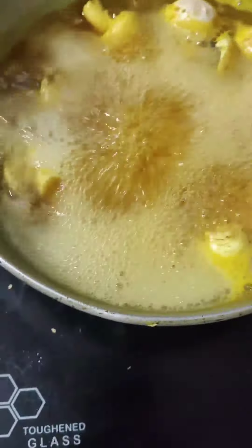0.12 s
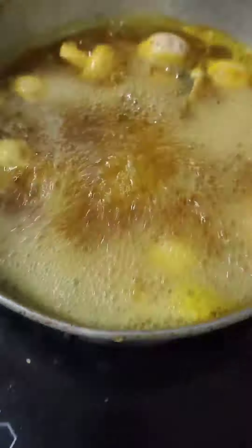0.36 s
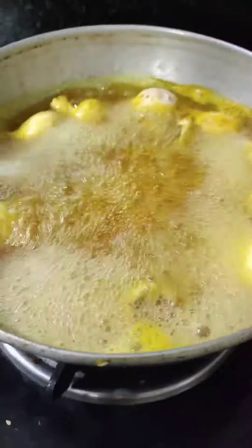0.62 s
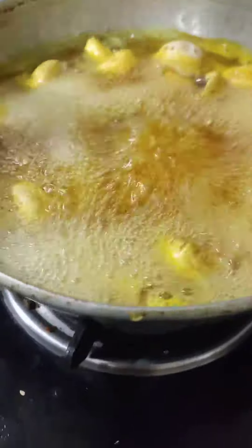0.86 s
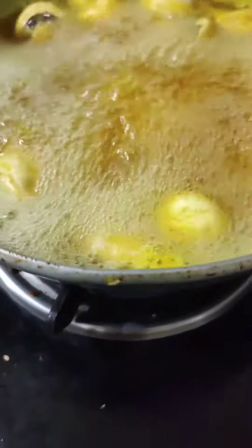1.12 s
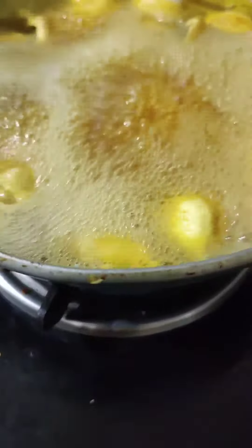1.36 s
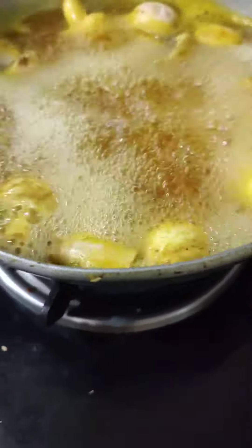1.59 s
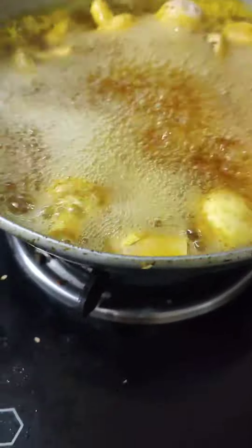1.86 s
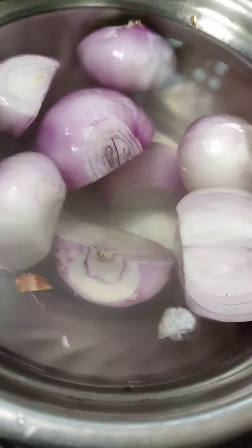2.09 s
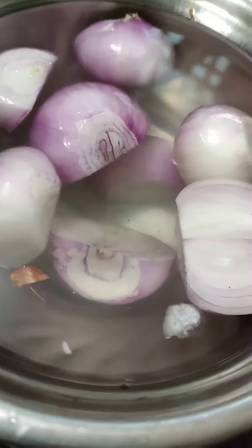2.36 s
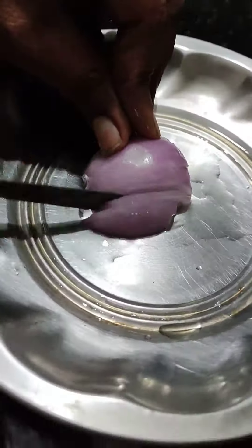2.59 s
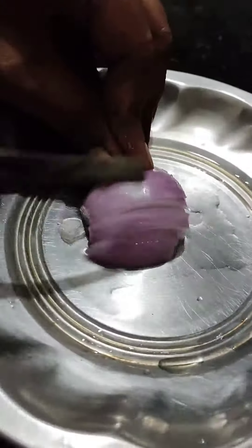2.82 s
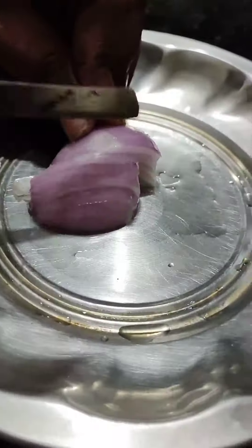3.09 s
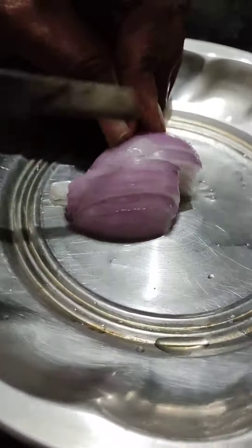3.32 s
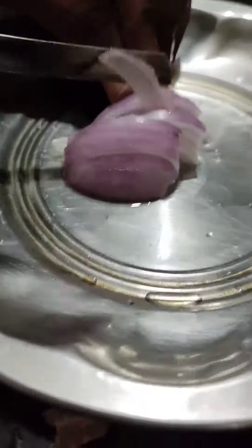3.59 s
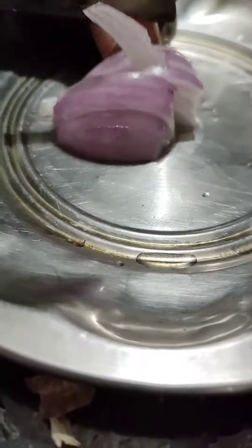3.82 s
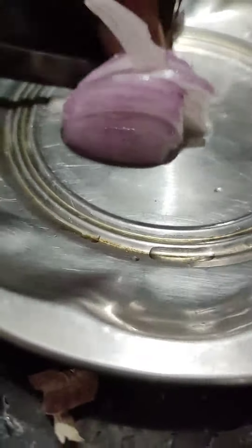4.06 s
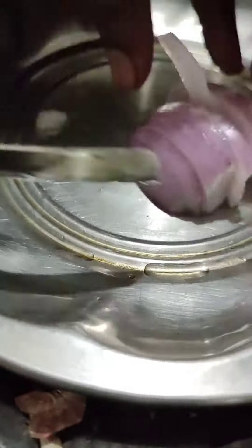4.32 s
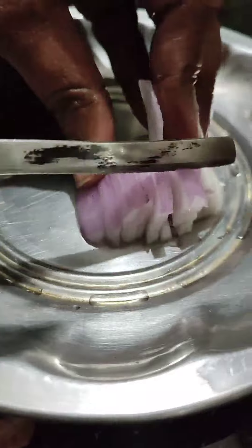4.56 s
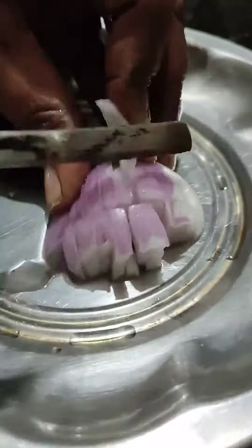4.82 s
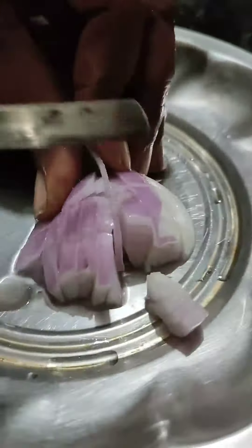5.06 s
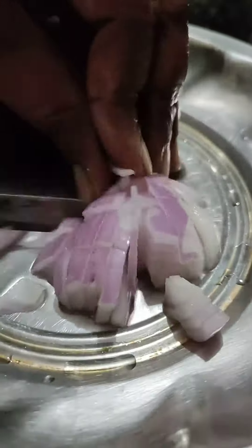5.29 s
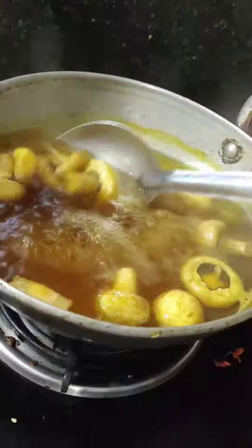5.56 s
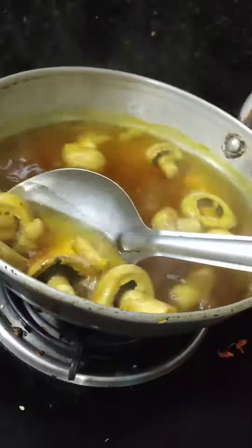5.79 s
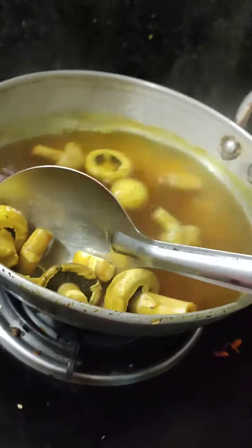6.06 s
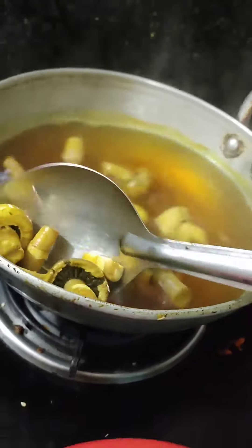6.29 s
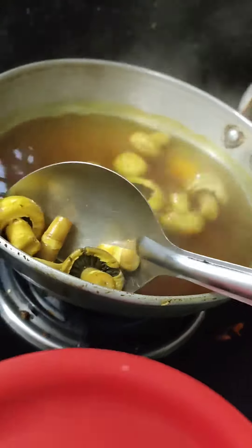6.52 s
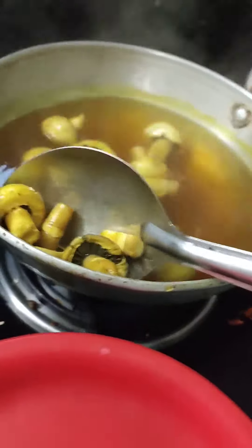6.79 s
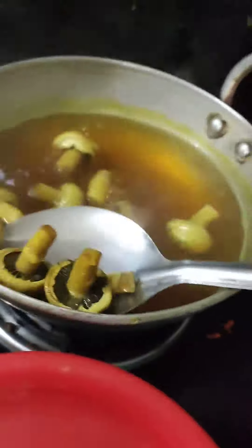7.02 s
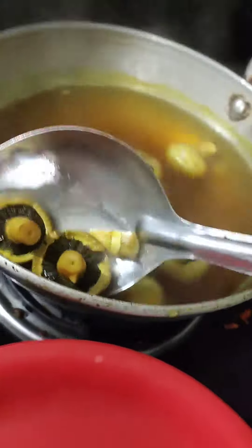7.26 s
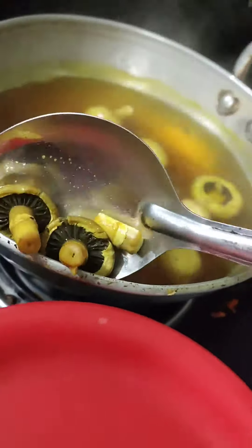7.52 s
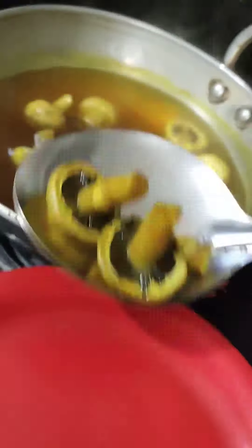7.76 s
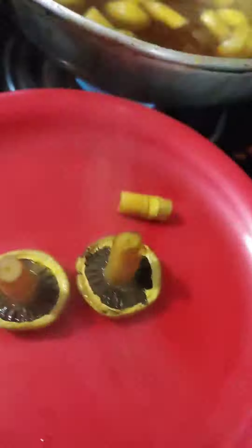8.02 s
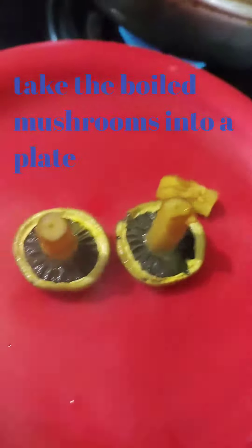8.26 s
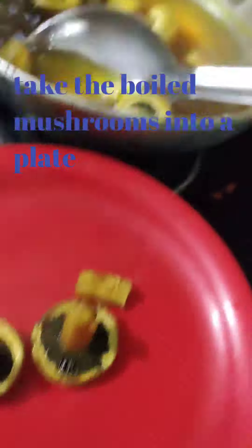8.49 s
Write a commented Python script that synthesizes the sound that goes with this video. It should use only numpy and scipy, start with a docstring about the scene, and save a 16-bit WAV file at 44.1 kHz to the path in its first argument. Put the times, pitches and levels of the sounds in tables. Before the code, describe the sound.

Four abruptly joined kitchen moments over low room rumble: soft boiling with crackling spray and short bird chirps; nearly still hum and faint gas hiss; irregular wet onion cuts with bright steel rings and dull thuds; then burner hiss with sparse ladle contacts, a damped metallic ring, one hard clank and light scrapes. Close stereo phone microphones, very short room echo.

```python
"""Four kitchen shots follow one another, heard through the two microphone ports of a phone.
First a pan simmers: flickering hiss, gliding bubbles, spits that ring the pan, and whistled bird notes outdoors.
A quiet shot of soaking onions has only a motor hum and burner hiss; then, over both, a knife saws an onion
on a steel plate: swarms of tiny slips ring the steel, and touches on it thud. Last a ladle works in a steel pan
of water, with hiss and a few birds. A room rumble lies under all; shots two to four fade in from a faint level."""
import sys
import numpy as np
from scipy import signal
from scipy.fft import rfft, irfft, next_fast_len
from scipy.io import wavfile
from scipy.ndimage import uniform_filter1d

SR = 44100
rng = np.random.default_rng(int(sys.argv[2]) if len(sys.argv) > 2 else 0)


def voltage_ratio(decibels):
    """Convert decibels (scalar or array-like) to amplitude ratios, 20 dB per decade."""
    exponent = np.asarray(decibels, float) / 20
    return 10 ** exponent


def generate_wav(signal):
    """Clip the signal to [-1, 1] and save it as 16-bit WAV at the path in sys.argv[1]."""
    frames = np.transpose(np.atleast_2d(signal))
    scaled = np.clip(frames, -1, 1) * 32767
    pcm = np.round(scaled).astype(np.int16)
    wavfile.write(sys.argv[1], SR, pcm)


N = 380583
TIME = np.arange(N) / SR

# cuts between shots: (time [s], fade-in [ms], depth of the baseline sag [full scale], time to its deepest [ms])
CUTS = [(1.718, 114, 0.0083, 114), (2.223, 109, 0.0045, 120), (5.234, 67, 0.0092, 91)]
# number of the shot at each sample, from 0 to 3
SHOT = np.searchsorted(np.transpose(CUTS)[0], TIME)
# balance of the two ports: (frequency [Hz], left minus right [dB])
PORT_BALANCE = [(60, -2), (110, 2.5), (200, -0.5), (380, -0.5), (690, 0), (1280, -3), (2350, -2),
                (4330, 0.5), (7980, 5), (14700, -2)]
# resonances of the pan and ladle, damped by the water: (frequency [Hz], width [Hz], level [dB])
PAN_MODES = [(730, 84, 6.5), (960, 120, -4.5), (1140, 200, -7.5), (1430, 46, -16), (1700, 80, -5),
             (1875, 63, -4), (2070, 75, -6), (2750, 110, -7.5), (3720, 250, -22), (4800, 76, -9.5),
             (6320, 620, -18)]
# colour of the simmering hiss and the spray: (frequency [Hz], relative level per Hz [dB])
SIMMER_COLOUR = [(590, -43), (1000, -4.5), (1370, -8.5), (2330, -6), (2720, -5), (3180, -5.5), (4860, -7.5),
                 (7840, -1), (10100, -7.5), (11700, -7.5), (14300, -15.5)]
# the blade lands on the plate, or once softly brushes it (at 3.39 s):
# (time of the peak [s], level [dB], length [ms], ring of the steel [dB], modes that ring most [Hz])
PLATE_TOUCHES = [(2.593, -38, 22, -5, 1780), (2.824, -15.5, 18.6, 18, 5400), (3.084, -29.5, 15, 7.5, 1700),
                 (3.315, -26.5, 13, -5, 1700), (3.39, -52, 54, 13, 2730), (3.557, -16, 18.6, 15, 3100),
                 (3.867, -12.5, 19, 13, 5010), (4.469, -27.5, 51, 2, 4800), (5.05, -30.5, 40, -2, 1900)]


def colour(points, hz):
    """Gain of (Hz, dB) points, joined by straight lines on a log-frequency axis."""
    at, db = np.transpose(points)
    return voltage_ratio(np.interp(np.log(hz + 1), np.log(at + 1), db))


def unit(x):
    """Scales a signal or spectrum to rms 1."""
    return x / np.sqrt(np.mean(np.abs(x) ** 2))


def walk(rate):
    """Slow random wandering: levels held 1 / rate seconds and smoothed twice; spread near 1."""
    hold = int(SR / rate)
    steps = np.repeat(rng.standard_normal(N // hold + 1), hold)
    return 1.3 * uniform_filter1d(uniform_filter1d(steps, hold), hold)[:N]


def air(points, flicker_db, rate):
    """Stereo noise in octave bands that each flicker alone; the ports agree mostly in the bass."""
    # how alike the two ports hear the background: (frequency [Hz], correlation [-1 to 1])
    likeness = [(60, 0.4), (130, 0.9), (290, 0.87), (630, 0.5), (1390, -0.19), (3050, 0.03), (6700, 0),
                (14700, 0.15)]
    size = next_fast_len(N)
    hz = np.arange(size // 2 + 1) * SR / size
    at, share = np.transpose(likeness)
    alike = np.clip(np.interp(np.log(hz + 1), np.log(at), share), -.9, .99)
    mid, side = rfft(rng.standard_normal((2, size))) * np.sqrt([1 + alike, 1 - alike])
    lean = np.sqrt(colour(PORT_BALANCE, hz))
    both = np.array([(mid + side) * lean, (mid - side) / lean]) * colour(points, hz)
    octave = np.log2(hz + 1)
    out = np.zeros((2, N))
    for k in range(2, 16):
        band = irfft(both * np.clip(1 - abs(octave - k), 0, 1), size)[:, :N]
        out += band * voltage_ratio(flicker_db * walk(rate))
    return unit(out)


def contacts(table, modes, broad, focus, rough, shape, lag_ms, apart):
    """Each row is a swarm of tiny slips under a swell; they crackle broadly and ring the steel."""
    apart_hz = 1300  # below this the two ports hear a contact alike
    detune = 0.018  # spread of the modes from touch to touch
    spot_db, port_spot_db = 2, 2.1  # chance in each mode's level, by touch and by port
    size = 16384
    out = np.zeros((2, N + size))
    hz = np.arange(size // 2 + 1) * SR / size
    octave = np.log2(hz + 1)
    ms = (np.arange(size) - size // 2) / SR * 1000
    rest_hz, width, mode_db = np.transpose(modes)[:, :, None]
    # the left port is a few centimetres further off, and brighter
    lean = np.sqrt(colour(PORT_BALANCE, hz))
    ports = np.array([lean * np.exp(-2j * np.pi * hz * lag_ms / 1000), 1 / lean])
    for s, peak_db, rise, fall, ring_db, ring_hz, pan_db in table:
        # the swell lies 8 dB under its peak one rise [ms] before it and one fall [ms] after it
        reach = np.where(ms < 0, max(rise, .05), max(fall, .05))
        swell = voltage_ratio(-8 * np.abs(ms / reach) ** shape)
        slips = rng.standard_normal((3, size)) * voltage_ratio(rough * rng.exponential(size=size))
        # part of the swarm reaches each port by its own path
        own_path = irfft(rfft(slips[1:]) / (1 + (apart_hz / (hz + 1)) ** 2), size)
        slips = slips[0] + apart * own_path
        # the slips come in lumps a few ms long
        lumps = np.interp(ms, np.arange(-190, 190, 4.), rng.standard_normal(95))
        slips = unit(slips * voltage_ratio(2.5 * lumps))
        # each touch has its own patchy colour, a third of an octave wide
        patches = voltage_ratio(2.5 * np.interp(octave, np.arange(8, 15, 1 / 3), rng.standard_normal(21)))
        # the place of the touch favours some modes (focus dB an octave);
        # each port hears them a little differently
        luck = rng.uniform(-1, 1, (3, len(modes), 1))
        # the pressing hand and the water detune the modes slightly
        at = rest_hz * (1 + detune * rng.standard_normal(rest_hz.shape))
        favour_db = spot_db * luck[0] + port_spot_db * luck[1:] - focus * np.abs(np.log2(at / ring_hz))
        gain = voltage_ratio(mode_db + favour_db) * np.sign(luck[1:] + .5)
        ring = np.sum(gain * 1j * hz * width / (at ** 2 - hz ** 2 + 1j * hz * width), axis=1)
        # thin steel radiates little below its lowest mode
        ring = ring / (1 + (.8 * rest_hz[0] / (hz + 1)) ** 4)
        body = unit(unit(colour(broad, hz) * patches) + voltage_ratio(ring_db) * unit(ring)) * ports
        swarm = unit(slips * swell) * np.sqrt(np.mean(swell ** 2))
        port_db = peak_db + np.array([[pan_db], [-pan_db]]) / 2
        start = int(s * SR)
        out[:, start:start + size] += irfft(rfft(swarm) * body, size) * voltage_ratio(port_db)
    return np.pad(out, ((0, 0), (0, size)))[:, size // 2:size // 2 + N]


def swells(table, share):
    """Splits each length into rise and fall."""
    return [(s, db, share * ms, (1 - share) * ms, *ring) for s, db, ms, *ring in table]


def placed(table, pan_db, per_ring):
    """Adds left minus right dB: swells lean to one side, and shift as the ring of the steel grows."""
    return [(*row, pan_db - per_ring * row[4]) for row in table]


def sudden(table, rise, fall, rattle_db, rattle_ms):
    """Sharp cracks and taps start at once and die within a few ms; a short, softer rattle trails each."""
    rows = []
    for s, db, *rest in table:
        rows.append((s, db, rise, fall, *rest))
        rows.append((s + 0.00092, db + rattle_db, 1.2, rattle_ms, *rest))  # rattle rises in 1.2 ms
    return rows


def rumble():
    """Low room noise throughout, with a level for each shot."""
    # colour of the rumble: (frequency [Hz], relative level per Hz [dB])
    rumble_colour = [(7.1, -38), (12, 1.5), (36, -3), (52, -8), (76, -16), (112, -7.5), (146, -11),
                     (198, -8.5), (264, -15.5), (324, -11.5), (575, -16), (650, -17), (798, -19.5),
                     (1600, -27), (2080, -54), (3520, -120)]
    # rumble of the four shots: level [dB]
    shot_db = [-50, -49.5, -49, -49]
    return voltage_ratio(np.array(shot_db))[SHOT] * air(rumble_colour, flicker_db=-2.17, rate=4)


def bubbles(rate, db, spread_db):
    """Small bubbles burst at the surface: a few cycles each, gliding up."""
    out, age = np.zeros((2, N)), np.arange(300) / SR
    first_cut = CUTS[0][0]
    for when, pitch, size, side in rng.uniform(size=(int(rate * first_cut), 4)):
        hz = 1500 * 5 ** pitch
        pop = np.sin(2 * np.pi * hz * age * (1 + 0.029 * hz * age)) * np.exp(-hz * age / 3.2)
        start = int(when * first_cut * SR)
        # small random sizes give the loudest pops
        pop = voltage_ratio(db - spread_db * np.log(size)) * pop
        out[:, start:start + len(age)] += pop * np.sqrt([[side], [1 - side]])
    return out


def simmer():
    """The boil of the first shot: flickering hiss that swells and eases, plus bubbles."""
    # the boil swells and eases: (time [s], hiss level before its flutter [dB])
    boil_level = [(0.0, -54), (0.5, -54), (0.9, -51), (1.14, -53), (1.71, -53)]
    hiss = air(SIMMER_COLOUR, flicker_db=1.0, rate=20) * voltage_ratio(.8 * walk(25))
    hiss = voltage_ratio(np.interp(TIME, *np.transpose(boil_level))) * hiss
    return (hiss + bubbles(rate=500, db=-58, spread_db=2.2)) * (SHOT == 0)


def birds():
    """Short gliding whistles with a rough warble, from outdoors."""
    # bird notes:
    # (time [s], start frequency before the warble [Hz], length [ms], level before the flutter [dB])
    notes = [(0.021, 3830, 22, -56), (.05, 4800, 20, -61), (.22, 3450, 21, -57.5), (.24, 3880, 24, -60),
             (.265, 5180, 16, -56), (0.53, 2580, 33, -49), (0.729, 3880, 21, -54.5), (.758, 5400, 12, -60),
             (1.005, 3520, 30, -58), (1.03, 2890, 21, -53), (1.045, 2010, 16, -55), (1.274, 3330, 27, -57),
             (1.3, 3860, 30, -56), (1.511, 3520, 20, -59), (1.529, 3830, 26, -62), (1.59, 2940, 54, -52.5),
             (5.77, 1300, 13, -52.5), (5.847, 1300, 33, -53), (5.96, 1350, 19, -50.5),
             (6.81, 2860, 11, -55), (7.5, 2090, 12, -52), (7.515, 1270, 20, -54.5), (7.71, 1337, 20, -50.5),
             (7.808, 1355, 36, -51)]
    # notes above the level pitch slide up, notes below it slide down, by a share for each octave
    level_note_hz, slide_per_octave = 2160, 0.095
    out, waver = np.zeros(N), 1 + .015 * walk(200)
    for s, from_hz, ms, db in notes:
        to_hz = from_hz * (1 + slide_per_octave * np.log2(from_hz / level_note_hz))
        along = np.linspace(0, 1, int(ms * SR / 1000))
        start, stop = int(s * SR), int(s * SR) + len(along)
        hz = (from_hz + (to_hz - from_hz) * along) * waver[start:stop]
        tone = np.sin(2 * np.pi * np.cumsum(hz) / SR)
        out[start:stop] += np.sqrt(2) * voltage_ratio(db) * tone * np.sin(np.pi * along) ** .5
    out = out * voltage_ratio(3 * walk(300))
    return np.array([out, np.roll(out, 9)])  # the right port hears them 9 samples later


def spits():
    """Bursts of spray from the boil patter on the pan."""
    # spits: (time of the peak [s], level [dB], length [ms], modes that ring most [Hz])
    bursts = [(0.342, -46.5, 6, 1950), (0.352, -49, 6, 1740), (0.542, -55, 40, 3000),
              (0.648, -51, 35, 6500), (0.849, -45, 16, 6260), (0.93, -52, 54, 2740),
              (0.969, -47.5, 41, 6260), (1.505, -49.5, 14, 6500), (1.636, -41, 18, 5000)]
    ring_db = -4
    rows = [(s, db, ms, ring_db, hz) for s, db, ms, hz in bursts]
    return contacts(placed(swells(rows, share=.45), pan_db=-2.0, per_ring=0.34), PAN_MODES, SIMMER_COLOUR,
                    focus=15.0, rough=1.8, shape=1.4, lag_ms=0.255, apart=1.0)


def hum():
    """A motor tone in the two middle shots, wavering in pitch and level."""
    # motor hum: (time [s], level before the waver [dB])
    hum_level = [(1.75, -67), (1.87, -55.5), (2.2, -56), (2.3, -59.5), (2.9, -60.5), (3.4, -56), (5.2, -52)]
    s, db = np.transpose(hum_level)
    hz = 122 + 3.35 * walk(25) + 1.5 * walk(8)
    level = voltage_ratio(np.interp(TIME, s, db) + 0.73 * walk(16))
    tone = np.sqrt(2) * level * np.sin(2 * np.pi * np.cumsum(hz) / SR)
    return np.array([tone, np.roll(tone, 14)]) * (TIME > CUTS[0][0]) * (TIME < CUTS[2][0])


def burner():
    """A fainter flickering hiss in every shot after the first."""
    # colour of the burner hiss: (frequency [Hz], relative level per Hz [dB])
    burner_colour = [(590, -32), (1000, -13.5), (1780, -8), (2300, -7.5), (3010, -11), (4750, -14),
                     (6860, -12), (8020, -7), (9370, -14), (13700, -21.5), (14300, -22.5)]
    # burner hiss: (time [s], level [dB])
    burner_level = [(1.8, -60.5), (2.22, -59.5), (2.4, -59), (3.4, -58.5), (4.5, -58), (5.3, -56.5),
                    (5.52, -55.5), (5.6, -62.5), (5.7, -58.5), (5.9, -58), (7.7, -58.5), (8.1, -57),
                    (8.63, -58.5)]
    hiss = air(burner_colour, flicker_db=.8, rate=14)
    return voltage_ratio(np.interp(TIME, *np.transpose(burner_level))) * hiss * (SHOT > 0)


def knife():
    """Sawing strokes, touches on the plate with a shiver after each, and sharp cracks of the blade."""
    # resonances of the plate, damped by the hand and the onion: (frequency [Hz], width [Hz], level [dB])
    plate_modes = [(760, 66, -21), (1327, 190, -7.5), (1790, 52, 3.5), (2150, 140, -5.5), (2400, 64, -9),
                   (2927, 74, 2.5), (3413, 220, -6.5), (4000, 240, -7.5), (4880, 590, -7.5),
                   (5350, 130, -3.5), (5850, 56, -5), (6200, 110, -1), (6900, 120, -9.5)]
    # broad colour of tearing cells: (frequency [Hz], relative level per Hz [dB])
    crunch_colour = [(500, -32), (800, -13), (1400, -6), (1900, -3), (3000, -11), (5300, -12), (8000, -0.5),
                     (9700, -8), (13600, -16), (14300, -16)]
    # the blade saws through the onion: (time of the peak [s], level [dB], rise [ms], fall [ms])
    saw_strokes = [(2.31, -36.5, 30, 7), (2.325, -37, 31, 4), (2.377, -38.5, 38, 12.7),
                   (2.506, -34.5, 20, 12.5), (2.55, -39.5, 19, 38), (2.741, -29, 18.6, 16),
                   (2.789, -32.5, 17, 12), (2.995, -31, 9.5, 25), (3.015, -28, 18, 11.4),
                   (3.062, -34, 17, 19.4), (3.208, -39, 1.2, 4.6), (3.228, -28.5, 7.3, 24),
                   (3.242, -21, 3, 6.5), (3.29, -33, 28, 17), (3.441, -39, 2.7, 22),
                   (3.482, -29.5, 28.6, 16.6), (3.525, -33, 10, 18), (3.761, -33.5, 11.6, 17),
                   (3.779, -21.5, 3.6, 5.3), (3.82, -35.5, 8.7, 13), (3.847, -28.5, 17, 7.5),
                   (4.397, -34, 27, 6.6), (4.411, -27, 17, 8.2), (4.63, -43, 0.8, 2.8),
                   (4.678, -32.5, 21.4, 12), (4.746, -33, 22.5, 22.5), (4.934, -46, 3.4, 30),
                   (4.967, -35.5, 16, 6), (4.975, -33, 2.1, 14.5), (5.025, -33, 7.7, 11),
                   (5.1, -33, 15, 11.6), (5.207, -33, 6.9, 9.6)]
    # sharp cracks of the blade, many within a stroke or a touch on the plate:
    # (time [s], peak [dB], ring of the steel [dB], modes that ring most [Hz], left minus right [dB])
    blade_cracks = [(2.3233, -25, -18, 6160, 5), (2.593, -29.5, 5, 1800, 16), (3.014, -22, -2, 1750, 4),
                    (3.0591, -26, -2, 1790, 8), (3.082, -30, -3, 1800, -6), (3.156, -40.5, 5, 4210, -8),
                    (3.193, -32.5, -6, 5790, -1), (3.2415, -7.5, -16, 5950, 4.5),
                    (3.7785, -11, -1, 2150, 5), (4.003, -36.5, 1, 2000, 1),
                    (4.193, -16.5, -5.5, 1770, -7.5), (4.3682, -30.5, -4, 6000, 8),
                    (4.3767, -32, -6, 5240, -2), (4.4086, -21, -4, 1790, -8),
                    (4.4702, -22.5, -13, 4940, -14), (4.966, -31, -14, 6500, 21),
                    (5.049, -18.5, -14, 1820, 6), (5.0973, -30, -12, 2940, -11),
                    (5.1885, -18, 3, 1790, -1.5)]
    # the onion muffles the plate; mostly its top modes answer a stroke
    stroke_ring_db, stroke_ring_hz = -6, 6400
    strokes = [(*row, stroke_ring_db, stroke_ring_hz) for row in saw_strokes]
    # the plate shivers on after each touch, with a level relative to it
    delay_s, shiver_db, rise_ms, fall_ms, shiver_ring_db, shiver_hz = .05, -32.5, 30, 22, 12, 2700
    shivers = [(s + delay_s, db + shiver_db, rise_ms, fall_ms, shiver_ring_db, shiver_hz)
               for s, db, *_ in PLATE_TOUCHES]
    cracks = sudden(blade_cracks, rise=0.18, fall=0.46, rattle_db=-12.5, rattle_ms=3.5)
    long = placed(strokes + swells(PLATE_TOUCHES, share=0.52) + shivers, pan_db=0.9, per_ring=0.17)
    return contacts(long + cracks, plate_modes, crunch_colour,
                    focus=3.4, rough=2.74, shape=1.65, lag_ms=0.3723, apart=1.0)


def thuds():
    """Each touch of the blade pushes the plate onto the counter: a short dull knock, alike in both ports."""
    thud_hz, thud_ms = 334, 9.8  # counter under the plate
    thud_db, follow = -31.5, .55  # the knock grows by a share of each dB of the touch
    push, age = np.zeros(N), np.arange(int(.08 * SR)) / SR
    for s, db, *_ in PLATE_TOUCHES:
        burst = rng.standard_normal(len(age)) * np.exp(-1000 * age / thud_ms)
        push[int(s * SR):int(s * SR) + len(age)] += voltage_ratio(thud_db + follow * db) * burst
    knock = signal.lfilter(*signal.butter(2, [thud_hz / 1.66, thud_hz * 1.71], "bandpass", fs=SR), push)
    return knock * np.sqrt(SR / thud_hz / 2)


def ladle():
    """Scrapes, knocks and taps on the water-filled pan."""
    # broad colour of a bare contact: (frequency [Hz], relative level per Hz [dB])
    contact_colour = [(530, -13.5), (900, -1.5), (2350, -11.5), (2700, -6.5), (3250, -9.5), (4710, -11.5),
                      (5110, -13), (7930, 0), (14300, -25.5)]
    # ladle scraping and knocking the pan:
    # (time of the peak [s], level [dB], length [ms], ring of the steel [dB], modes that ring most [Hz])
    pan_scrapes = [(6.009, -46.5, 70, -3, 1240), (6.63, -35, 17, 5, 730), (6.657, -30.5, 38, 13.5, 1100),
                   (6.682, -35.5, 26, 11, 730), (7.35, -45.5, 21, 8, 2750), (7.382, -37, 37, -3, 2750),
                   (7.6272, -10.5, 3.2, -1, 980), (7.6325, -19, 4, 1, 1150), (7.66, -61, 27, 0, 820),
                   (7.993, -41.5, 26, -22, 6500), (8.055, -44, 68, -7, 690), (8.118, -53, 91, -31, 870),
                   (8.251, -49, 76, 6, 730), (8.392, -46, 50, 11, 650)]
    # taps of the ladle:
    # (time [s], peak [dB], ring of the steel [dB], modes that ring most [Hz], left minus right [dB])
    ladle_taps = [(5.268, -29, -20, 6330, 8), (6.23, -36.5, -12, 5800, -8),
                  (6.3662, -26.5, -11, 3700, -12.5), (6.638, -22, 15, 1960, -4),
                  (6.79, -33.5, -10, 2760, -12), (7.6258, -5, -2.5, 1400, 2)]
    long = placed(swells(pan_scrapes, share=0.6), pan_db=1.0, per_ring=0.12)
    taps = sudden(ladle_taps, rise=.11, fall=0.48, rattle_db=-18.5, rattle_ms=3.5)
    return contacts(long + taps, PAN_MODES, contact_colour,
                    focus=13.0, rough=3.23, shape=1.45, lag_ms=.2, apart=1.0)


def kitchen(near, t60, db):
    """Hard walls return a short, duller tail, another one to each port."""
    age = np.arange(int(.3 * SR)) / SR
    tail = rng.standard_normal((2, len(age))) * voltage_ratio(-60 * age / t60) * (age > .003)
    tail = signal.lfilter([1], [1, -.3], tail)
    tail = tail / np.sqrt(np.sum(tail[0] ** 2))
    return near + voltage_ratio(db) * signal.fftconvolve(near, tail, axes=1)[:, :N]


def scene():
    """Close contacts and birds with the echo of the kitchen, over rumble, hum and hiss."""
    background = rumble() + simmer() + hum() + burner()
    near = spits() + knife() + thuds() + ladle()
    return background + kitchen(birds(), t60=0.1, db=-6) + kitchen(near, t60=0.12, db=-18)


def top_cut(x):
    """Nothing passes above the cut-off."""
    return signal.sosfilt(signal.butter(12, 15310, fs=SR, output="sos"), x)


def record(dry):
    """The ports ring in the treble, the top is cut, shots fade in, peaks round off and the baseline sags."""
    # resonances of the microphone ports: (frequency [Hz], width [Hz], boost [dB])
    port_modes = [(7930, 323, 2.5), (12530, 320, 2.5)]
    top_hz, ceiling = 14330, .95  # ceiling as a share of full scale
    for hz, width, db in port_modes:
        dry = dry + (voltage_ratio(db) - 1) * signal.lfilter(*signal.iirpeak(hz, hz / width, fs=SR), dry)
    dry = signal.sosfilt(signal.ellip(8, .3, 38, top_hz, fs=SR, output="sos"), dry)
    fade, sag = np.ones(N), np.zeros(N)
    for s, fade_ms, depth, sag_ms in CUTS:
        since = np.clip(TIME - s, 0, None) * 1000
        fade *= np.where(TIME < s, 1, np.clip(since / fade_ms, .03, 1))
        # the baseline dips after the cut, then settles
        sag -= depth * (since / sag_ms) ** 2 * np.exp(2 - 2 * since / sag_ms)
    rounded = ceiling * np.tanh(dry * fade / ceiling)
    return top_cut(rounded + sag)


dry = scene()
out = record(dry)
generate_wav(out)
```